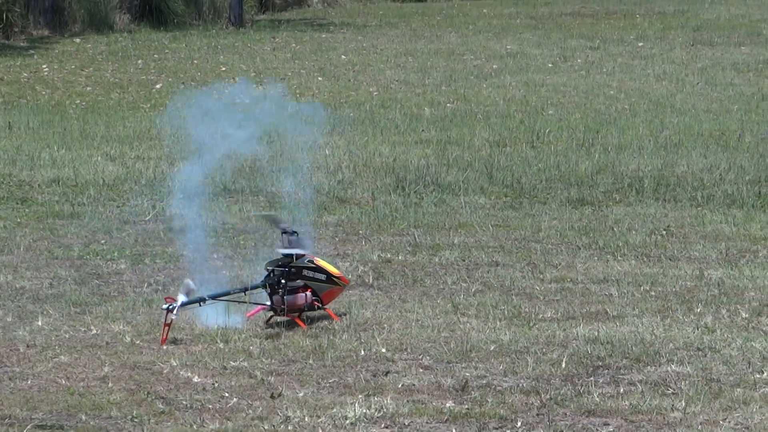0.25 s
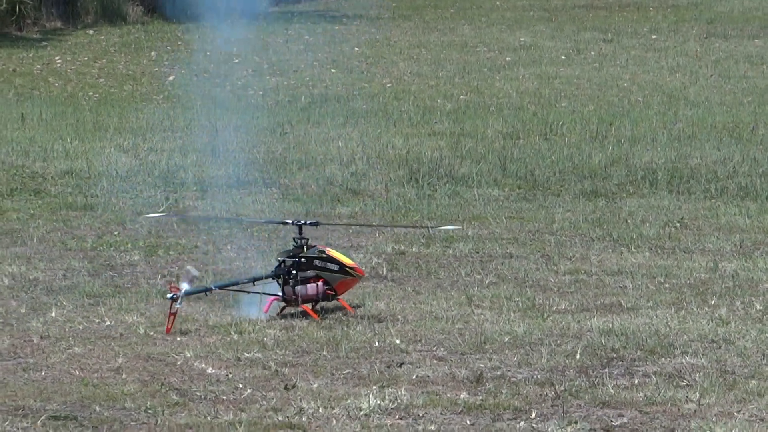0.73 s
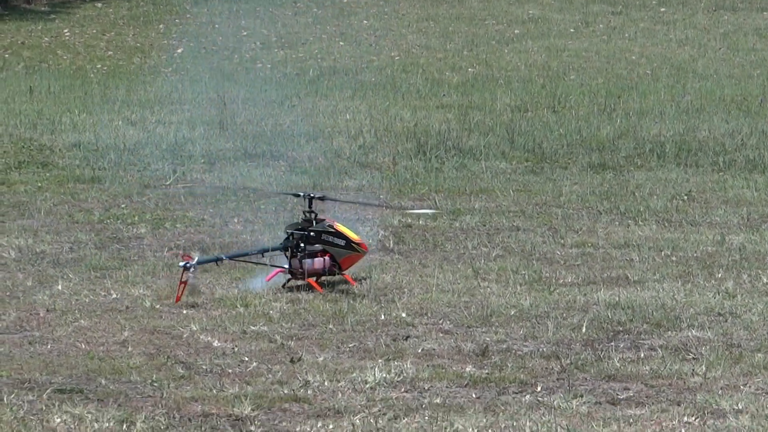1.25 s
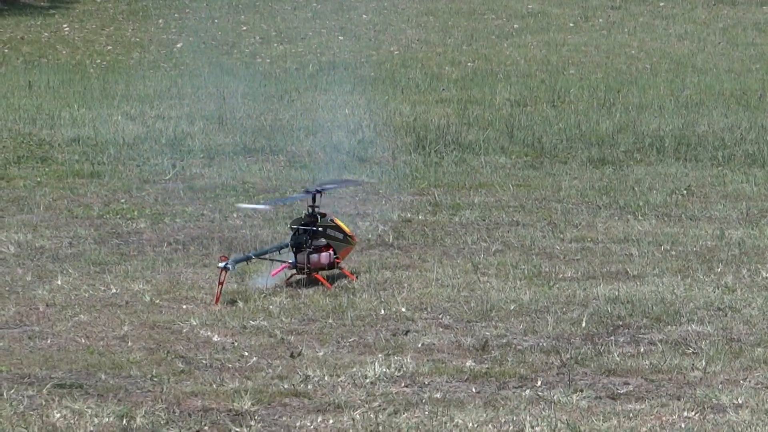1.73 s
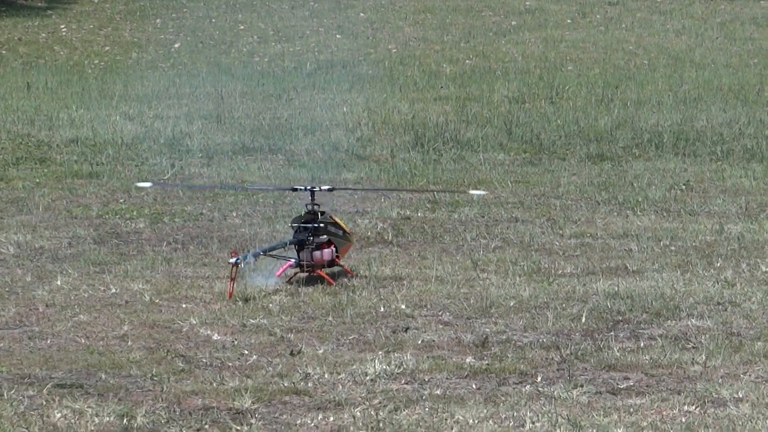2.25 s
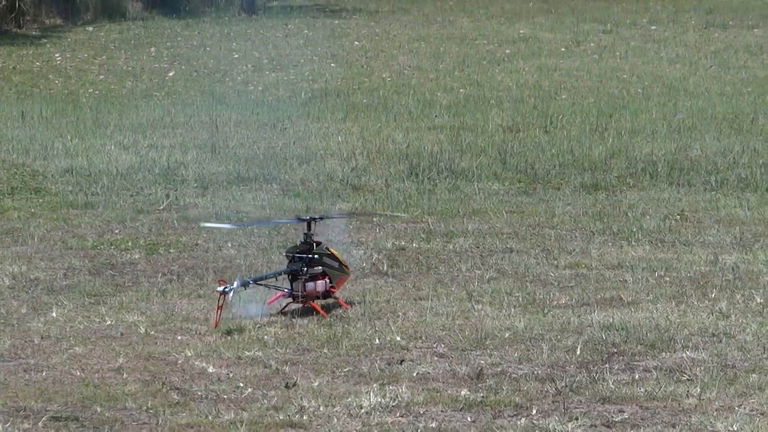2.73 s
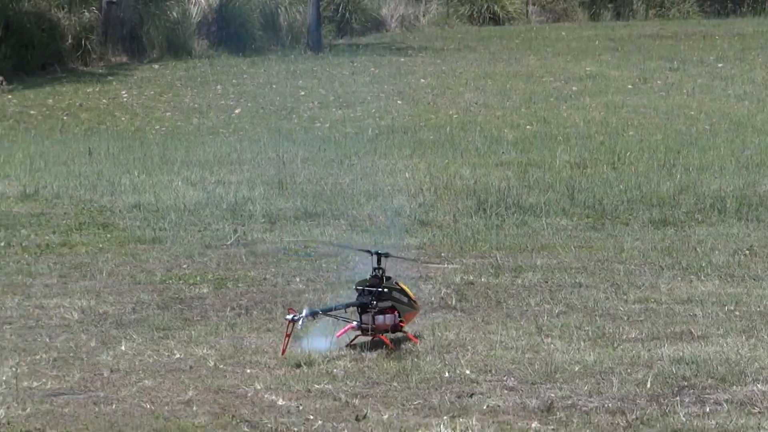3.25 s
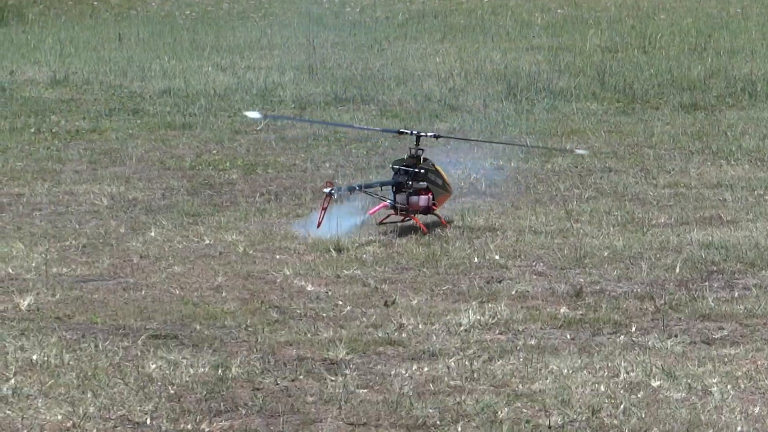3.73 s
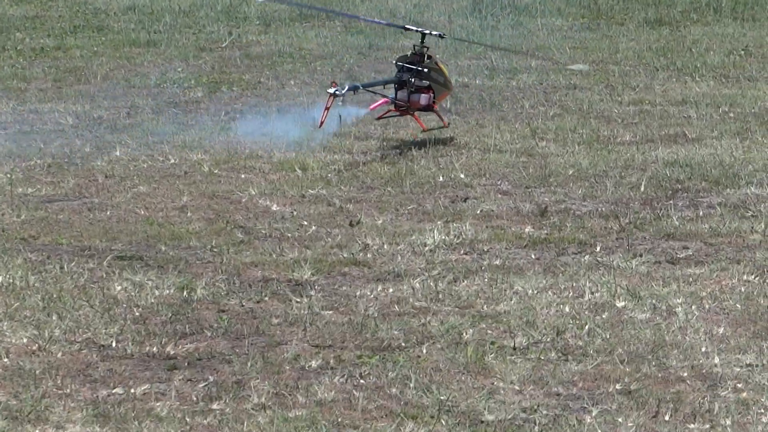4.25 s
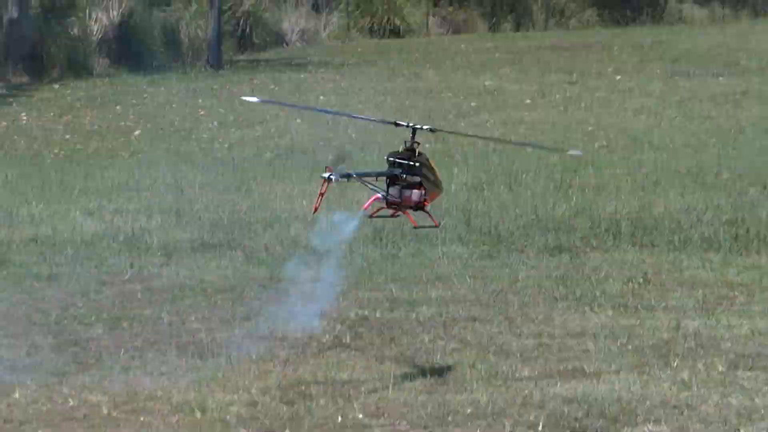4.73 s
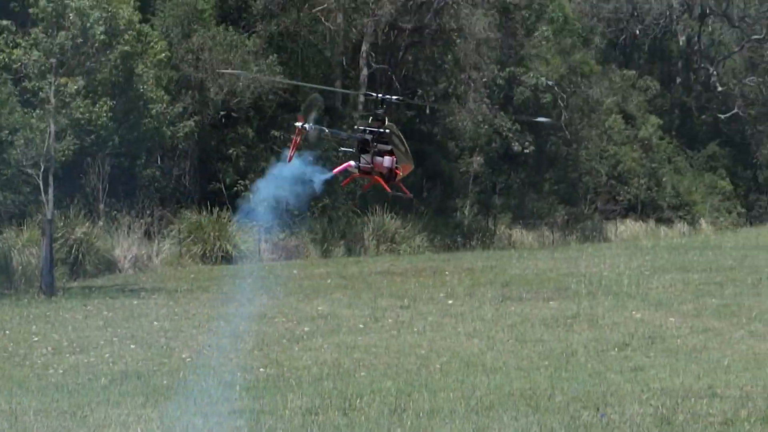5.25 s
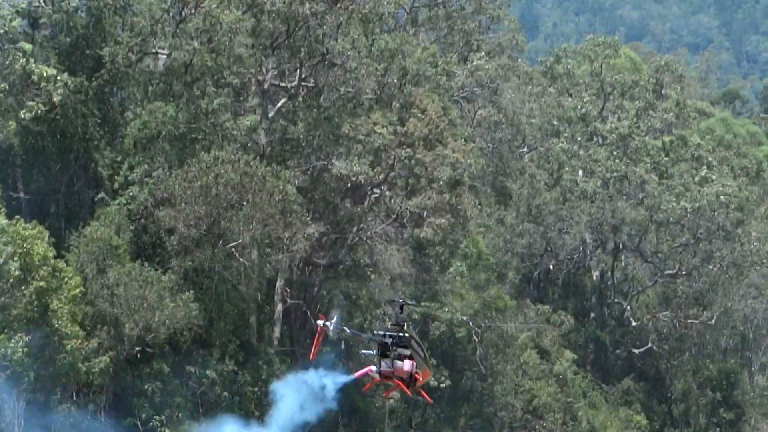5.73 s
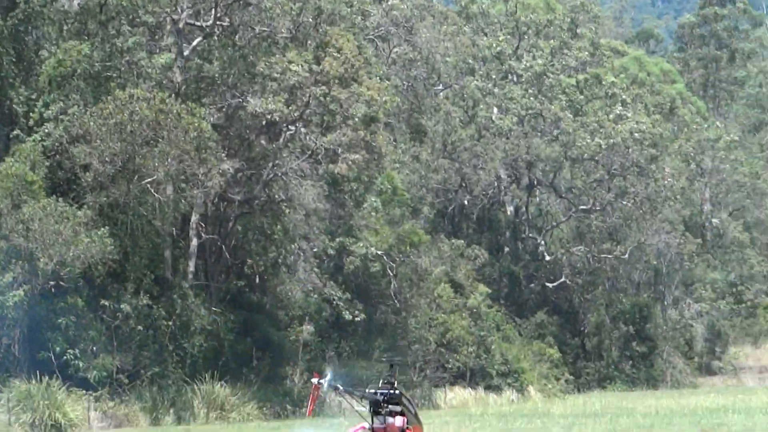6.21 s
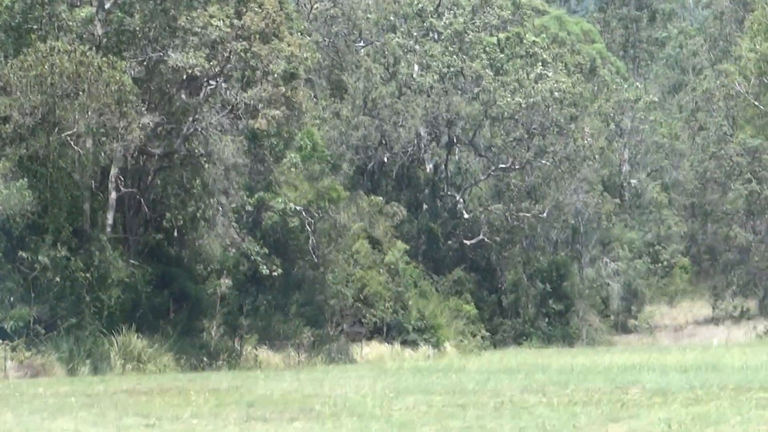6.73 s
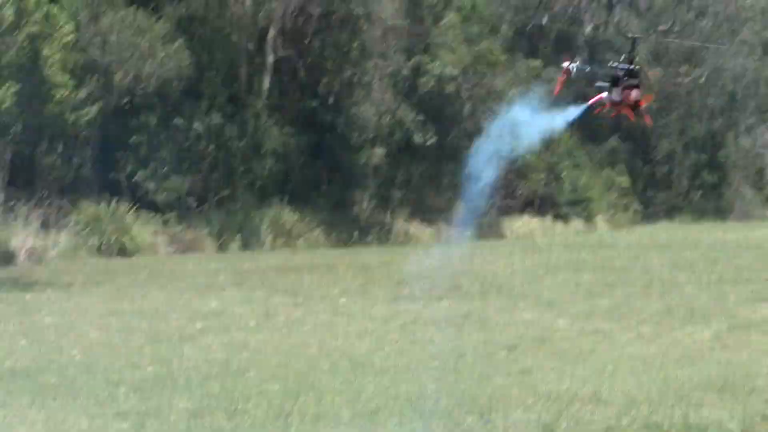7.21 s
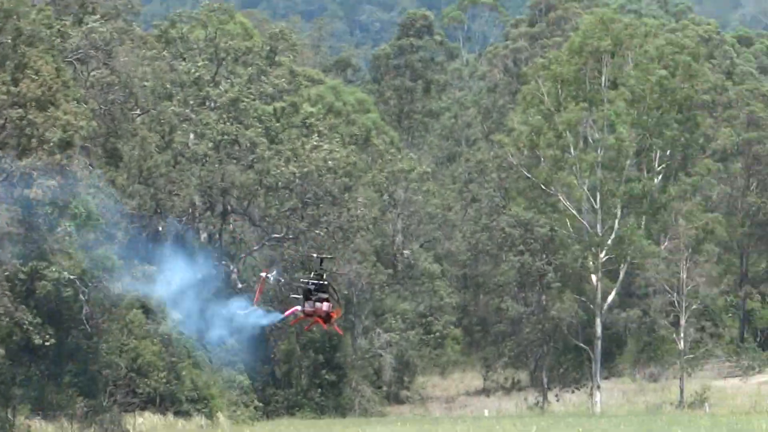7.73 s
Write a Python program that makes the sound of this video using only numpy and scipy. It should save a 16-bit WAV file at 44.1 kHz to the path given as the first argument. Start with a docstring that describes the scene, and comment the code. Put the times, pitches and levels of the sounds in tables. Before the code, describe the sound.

A small two-stroke model helicopter runs on open grass, heard through a stereo outdoor microphone with little space around it. From 0 to 3 s the engine holds a nearly steady buzz near 235 Hz, under a piercing cooling-fan whine around 2.3 kHz and dense, bright airy hiss; a soft dull pop comes at 1.3 s and the pitch sags slightly. From 3 s it revs up, rotor and gear tones emerging, the whine throbbing as it lifts off around 4 s. Through 4.5-5.7 s the exhaust grows fuller and harsher at a wavering, nearly level pitch. From 5.8 to 6.8 s engine, gears and rotors climb together to about 286 Hz. Near 7 s the engine bogs abruptly, dropping in pitch with a rough growl, then clears and rises steadily to nearly 300 Hz, still running at the 8 s cut.

```python
"""The two-stroke of a glow-fuel model helicopter on grass: exhaust partials, bearing tones and cooling-fan
whine, all sines locked to the crank. The clutch drags the rotors up to it; the machine lifts off and turns
while the clutch still slips; once it grips, engine, gears and rotors climb together. Rotor and gear tones
follow the clutch bell; gas and air make a broad hiss of filtered noise, with one dull pop."""
import sys
import numpy as np
from scipy import signal
from scipy.fft import rfft, irfft, next_fast_len
from scipy.io import wavfile
from scipy.ndimage import uniform_filter1d

SR = 44100
rng = np.random.default_rng(int(sys.argv[2]) if len(sys.argv) > 2 else 0)


def to_wav(sig):
    """Store sig (one row per channel, or 1-D mono) as 16-bit WAV at the path in sys.argv[1].

    Samples outside -1..1 are clipped; the rate is SR.
    """
    pcm = np.clip(np.atleast_2d(sig), -1, 1) * 32767
    pcm = np.round(pcm).astype(np.int16)
    wavfile.write(sys.argv[1], SR, pcm.T)  # frames by channels


N = 351477
T = np.arange(N) / SR

# exhaust swells as the silencer turns and leaves the ground: start_s, third_db, fifth_db, seventh_db
EXHAUST_SWELLS = [(0, 0, -1, -4), (1.2, -3.3, -1.2, -3.5), (1.36, -2, -7.5, 3.5), (2.5, -1, -14.5, 1),
                  (2.75, -1, -8, 2.5), (3.1, -1.5, -5, -4.5), (3.85, 4, 8, 16.5), (4.33, 5, 4.5, 19),
                  (4.65, 9, 12, 21.5), (4.9, 14.5, 16.5, 19.5), (5.15, 15, 11.5, 14), (5.75, 15.5, 12, 7),
                  (6.1, 15, 6.5, 10), (6.35, 11, 6.5, 13), (6.6, 7.5, 17, 8), (7.1, 13.5, 7, 5.5),
                  (7.35, 6.5, 14.5, 6), (7.7, .7, 18.5, 13.5), (7.97, 4, 16.5, 17)]
# gas and air noise: start_s, gain_db, aloft_share, rumble_db (bands under 700 Hz)
HISS_COURSE = [(0, 44.5, 0.15, 0), (1.24, 46, .05, 2), (1.53, 44.5, .03, 1.5), (1.93, 46.5, 0.032, 1.5),
               (3.3, 45, 0.076, 1), (4.1, 44.5, .25, -1), (4.6, 44.5, 0.46, -9), (4.9, 44.5, 0.69, -5),
               (5.8, 45, 0.76, -7), (6.7, 46, 0.92, -7), (6.9, 44.5, 1.14, -4), (7.15, 45.5, 0.69, -7),
               (7.6, 44.5, 0.71, -1), (8, 44.5, 1.08, -5)]


def undb(db):
    """Amplitude ratio of a level in dB."""
    return 10 ** (np.asarray(db) / 20)


def curves(table):
    """Columns of a table, interpolated from its times to every sample."""
    s, *columns = np.transpose(table)
    return [np.interp(T, s, c) for c in columns]


def at_hz(table, hz):
    """Level in dB, interpolated over log frequency."""
    table_hz, db = np.transpose(table)
    return np.interp(np.log(hz), np.log(table_hz), db)


def walk(rate_hz):
    """Random levels held 1 / rate_hz s and slewed twice; spread near 1."""
    hold = max(int(SR / rate_hz), 1)
    steps = np.repeat(rng.standard_normal(N // hold + 1), hold)
    return 1.142 * uniform_filter1d(uniform_filter1d(steps, hold), hold)[:N]


def bump(s, width_s):
    """A bell-shaped swell from 0 to 1 and back."""
    return np.exp(-((T - s) / width_s) ** 2)


def tone(turns, db, flutter_db, waver_rad, waver_hz=60):
    """A sine of nominal rms level db whose size flutters and whose phase wavers."""
    phase = 2 * np.pi * (turns + rng.random()) + waver_rad * walk(waver_hz)
    return np.sqrt(2) * undb(db + flutter_db * walk(35)) * np.sin(phase)


def exhaust(turns):
    """Gas pulses, one firing per crank turn: partials of the firing rate, swelling apart."""
    # main partials: firing_multiple, rest_db, third_share, fifth_share, seventh_share, bog_db
    partials = [(1, -50.5, -0.059, 0.2, 0.22, 9), (2, -38.5, -0.22, 0.21, -0.12, 0),
                (3, -40.5, 0.83, -0.0032, -0.059, -13), (4, -41.5, 0.045, 0.0047, 0.21, 1),
                (5, -42, -0.16, 1, 0.067, -1), (6, -28.5, 0.3, 0.087, -.36, 6),
                (7, -47.5, -0.14, 0.12, 1, 18.5)]
    # other partials: firing_multiple, rest_db, seventh_share
    others = [(8.02, -55, 1), (9.01, -42, 0.34), (10.98, -50, 0.6), (12, -36, -0.23), (12.97, -48.5, 0.48),
              (13.73, -48, 0.4), (14.94, -49, 0.79), (16.18, -40.5, -0.049), (16.5, -53, -0.0049),
              (17.87, -45, .05), (18.96, -47.7, -0.07), (30.06, -44, 0.011)]
    # strong and weak firings alternate: firing_multiple, relative_db
    half_rate = [(.5, -9), (1.5, 0), (2.5, 3), (3.5, 4)]
    third_db, fifth_db, seventh_db = curves(EXHAUST_SWELLS)

    # the pilot pulls up hard: the engine bogs ever deeper, then clears at once
    bog_s, build_s, clear_s, other_bog_db = 6.97, 0.19, 0.053, 15.5
    bog = bump(bog_s, np.where(T < bog_s, build_s, clear_s))

    # the 4th partial all but vanishes from lift-off until the climb
    from_s, to_s, edge_s, depth_db = 3.5, 6.3, 0.17, -27
    hollow_db = depth_db / 2 * (np.tanh((T - from_s) / edge_s) - np.tanh((T - to_s) / edge_s))

    out = np.zeros(N)
    for k, rest_db, a, b, c, bog_db in partials:
        db = rest_db + a * third_db + b * fifth_db + c * seventh_db + bog_db * bog
        out += tone(k * turns, db + hollow_db * (k == 4), 0.69, 0.068 * k)
    for k, rest_db, share in others:
        out += tone(k * turns, rest_db + share * (seventh_db + other_bog_db * bog), 1.5, 0.5)

    half_db = -77.5 + 19 * bump(3.53, 0.6)
    for k, db in half_rate:
        out += tone(k * turns, half_db + db, 1.6, 0.2)
    return out


def crank_bearing(turns, aloft):
    """Balls rolling past one spot of the race: a tone at the ball rate and its overtones."""
    # rest_db, aloft_db, seventh_share
    ball_partials = [(-45, -57, -0.23), (-48, -44, -0.1), (-46, -53, 0.94)]
    balls_per_turn = 3.62
    seventh_db = curves(EXHAUST_SWELLS)[2]
    out = np.zeros(N)
    for k, (rest_db, aloft_db, share) in enumerate(ball_partials, 1):
        db = rest_db + aloft * (aloft_db - rest_db) + share * seventh_db
        out += tone(k * balls_per_turn * turns, db, 1.2, 0.2)
    return out


def fan_whine(turns, blades, aloft):
    """Cooling-fan blade rate and overtones; each main blade passing overhead throbs the whine."""
    # blade-rate partials: start_s, first_db, second_db, third_db
    fan_levels = [(0, -27, -32.5, -31), (1.15, -26, -30, -35), (1.5, -28, -33.5, -34),
                  (2.6, -24.5, -38, -30), (3.4, -24.5, -28.5, -48), (4.15, -21, -35, -28),
                  (4.71, -17.5, -37, -29), (4.84, -26, -36, -30.5), (4.97, -20, -35, -32),
                  (5.2, -25.5, -36, -34), (5.5, -22, -30, -30), (5.95, -26, -27, -43),
                  (6.1, -23.5, -36, -28.5), (6.47, -17.5, -42, -30.5), (6.68, -26.5, -33, -44),
                  (6.75, -24, -29, -38), (6.9, -20, -40, -40), (6.95, -31, -42, -40), (7.0, -32, -42, -38),
                  (7.03, -21, -41, -37), (7.14, -33, -40, -27), (7.17, -21, -40, -31),
                  (7.75, -19, -36, -41), (7.97, -25, -38, -45)]
    # phase waver of partials 2 and 3: blur_rad
    blurs_rad = [.45, 1.4]
    # faint partials 4 and 5: grass_db, aloft_db, blur_rad
    faint_partials = [(-35.5, -49, 2.2), (-56, -68, 1.2)]
    fan_turns = 10 * turns  # 10 blades

    first_db, *overtone_db = curves(fan_levels)
    fan = tone(fan_turns, first_db, 0.65, 0.64)
    for k, db in enumerate(overtone_db):
        fan += tone((k + 2) * fan_turns, db, 1.5, blurs_rad[k], 150)
    for k, (grass_db, aloft_db, blur_rad) in enumerate(faint_partials, 2 + len(blurs_rad)):
        db = grass_db + aloft * (aloft_db - grass_db) + 4.5 * walk(2.58)
        fan += tone(k * fan_turns, db, 1.55, blur_rad, 150)

    throb_db = 0.84 + 2.5 * bump(4.1, 0.42)  # deepest at lift-off
    return fan * undb(throb_db * np.sin(2 * np.pi * blades))


def hiss(turns):
    """Bands of gas and air noise that flicker partly alone, partly together, and puff with each firing."""
    # spectrum on the grass, before gain_db: centre_hz, density_db
    grass_spectrum = [(30, -112), (70, -102), (130, -94), (300, -79.5), (600, -80.5), (900, -68),
                      (1500, -61.5), (2900, -62), (4000, -61.5), (5700, -61.5), (7200, -62.5),
                      (10500, -65.5), (12000, -77), (15500, -93.5)]
    # spectrum aloft, before gain_db: centre_hz, density_db
    aloft_spectrum = [(30, -99), (70, -92), (130, -86), (300, -78), (600, -66.5), (900, -68.5),
                      (1500, -64.5), (2900, -62), (4000, -57.5), (5700, -61), (7200, -61.5), (10500, -63.5),
                      (12000, -72.5), (15500, -89)]
    # dips and rings while the machine stands still: centre_hz, width_hz, gain_db
    grass_comb = [(800, 86, 0), (1050, 167, -17), (1760, 560, -10.5), (3954, 215, 5.5), (4670, 410, 3.5),
                  (7060, 350, 5.5), (8210, 106, -9), (8160, 124, 9), (9560, 190, 4.5), (10400, 150, -1)]
    # stereo width: centre_hz, side_minus_mid_db
    side_spectrum = [(60, -30), (110, -32), (200, -20), (380, -10.5), (700, -12), (1290, -60), (2380, -14),
                     (4400, -11.5), (8120, -13), (11000, -23), (15000, -40)]
    gain_db, aloft, rumble_db = curves(HISS_COURSE)

    size = next_fast_len(N)
    hz = np.maximum(np.arange(size // 2 + 1) * SR / size, 1)
    mid, side = rfft(rng.standard_normal((2, size)))
    noise = np.array([mid, side * undb(at_hz(side_spectrum, hz))])
    comb_db = sum(db * np.exp(-((hz - f) / w) ** 2) for f, w, db in grass_comb)
    grass = undb(at_hz(grass_spectrum, hz) + comb_db)
    air = undb(at_hz(aloft_spectrum, hz))

    shared_db, gusts_db, top_db = 0.45 * walk(6), 1.03 * walk(18), 2.4 * walk(2.3)
    out = np.zeros((2, N))
    for octave in np.arange(4.5, 14.2, 0.5):
        centre_hz = 2 ** octave
        window = np.cos(np.pi / 2 * np.clip(2 * (np.log2(hz) - octave), -1, 1)) ** 2
        low = irfft(noise * window * grass, size)[:, :N]
        high = irfft(noise * window * air, size)[:, :N]
        flicker_db = shared_db + 0.39 * walk(14)
        flicker_db += top_db * (centre_hz > 11000) + gusts_db * (centre_hz > 7500)
        flicker_db += rumble_db * (centre_hz < 700)
        out += (low + aloft * (high - low)) * undb(flicker_db)
    out *= (1 + 0.084 * np.cos(2 * np.pi * turns)) * undb(gain_db)

    # a narrow ring in the airflow that throbs; the reversed spectrum serves as fresh noise
    grass_db, aloft_db = -47, -32
    ring_db = grass_db + aloft * (aloft_db - grass_db) + 0.73 * walk(2.5) + 3.7 * walk(30)
    ring = irfft(mid[::-1] * np.exp(-((hz - 9800) / 330) ** 2), size)[:N]
    out[0] += ring / ring.std() * undb(ring_db)
    return np.array([out[0] + out[1], out[0] - out[1]])


def rotors(blades, bell_hz):
    """Two-blade main and tail rotors: blade-rate tones that grow with speed."""
    # main rotor: blade_rate_multiple, relative_db
    main_partials = [(1, -5), (2, 0), (2.5, -4), (3, 0), (3.5, -4), (4, 4), (5, 4), (5.5, 5), (6, 5),
                     (6.5, -2), (7, 1), (7.5, -4), (8, 1), (9.5, 11), (10, 2)]
    doublings = np.log2(bell_hz / 250)
    # dB at a bell speed of 250 Hz + dB per doubling of speed
    tail_db, second_db = -48.5 + 23.4 * doublings, -50 + 35 * doublings
    upper_db, main_db = -59.5 + 13 * doublings, -71.5 + 37 * doublings

    tail_blades = 4.5 * blades  # tail gear ratio
    out = tone(tail_blades, tail_db, 0.65, 0.1) + tone(2 * tail_blades, second_db, 0.58, 0.1)
    for k in range(3, 6):
        out += tone(k * tail_blades, upper_db, 1.5, 0.3)
    for k, db in main_partials:
        out += tone(k * blades, main_db + db, 1.0, 0.19)
    return out


def gear_mesh(bell_turns, slip):
    """Second mesh tone of the pinion; clutch slip blurs it and raises its neighbours."""
    # gear whine: start_s, level_db
    gear_levels = [(0, -67), (3.4, -37), (3.75, -31), (4.3, -28.5), (4.75, -25.5), (4.95, -29), (5.3, -40),
                   (5.6, -28), (5.9, -21.5), (6.15, -30), (6.7, -39), (6.95, -32), (7.15, -22.5),
                   (7.4, -41), (8, -20.5)]
    # neighbours: pinion_turns_away, no_slip_db (relative)
    neighbours = [(-0.78, -25), (0.93, -22)]
    gear_db = curves(gear_levels)[0]
    mesh = 2 * 10  # second tone of 10 teeth
    out = tone(mesh * bell_turns, gear_db, 2.05, 0.94 + 1.3 * slip, 200)
    for k, db in neighbours:
        out += tone((mesh + k) * bell_turns, gear_db + db + 40 * slip, 3.16, 0.54, 200)
    return out


def pops():
    """A soft push of air about two cycles long."""
    # dull pop: start_s, level_db, pitch_hz, length_ms
    pop_list = [(1.308, -23.5, 280, 8)]
    out = np.zeros(N)
    for s, db, hz, ms in pop_list:
        u = np.clip((T - s) / (ms / 1000), 0, 1)
        out += undb(db) * np.sin(np.pi * u) ** 2 * np.sin(2 * np.pi * hz * (T - s))
    return out


def two_ports(tones):
    """Two microphone ports hear the tones slightly out of step, one a little louder by turns."""
    quadrature = signal.hilbert(tones, next_fast_len(N))[:N].imag
    step = 0.027 * quadrature - 0.055 * np.gradient(tones)
    side = step * undb(8.1 * walk(2.18)) + (0.0087 + 0.017 * walk(4)) * tones
    return tones + np.array([side, -side])


def scene():
    """Crank and clutch-bell speeds drive every tone; hiss and pop are added."""
    # crankshaft turns and firings per second: start_s, crank_hz
    crank_course = [(0, 233.6), (.2, 235.5), (1.1, 235), (1.42, 230.2), (2.55, 229.3), (3.02, 231.3),
                    (3.4, 235.2), (3.9, 242), (4.4, 245.7), (4.8, 247.8), (5.3, 246), (5.7, 247.2),
                    (6.06, 262), (6.46, 279.8), (6.62, 284.5), (6.77, 286.6), (6.88, 279.2), (7.0, 266.7),
                    (7.1, 269.3), (7.26, 277.5), (7.64, 288.3), (7.97, 297.8)]
    # slipping clutch bell, turns per second before the crank limit: start_s, bell_hz
    bell_course = [(0, 40), (3.0, 129), (3.8, 153.6), (4.2, 170), (5.1, 204), (5.7, 240.5), (6.2, 268.5),
                   (6.4, 300), (8, 303.3)]
    inertia_s = 0.062  # the flywheel rounds every change of speed
    crank_hz = uniform_filter1d(curves(crank_course)[0], int(inertia_s * SR), mode="nearest")
    crank_hz *= 1 + 0.001367 * walk(40) + 0.000699 * walk(8)  # uneven burning
    turns = np.cumsum(crank_hz) / SR

    bell_hz = np.minimum(curves(bell_course)[0], crank_hz)  # never faster than the crank
    bell_turns = np.cumsum(bell_hz) / SR
    slip = np.minimum(1 - bell_hz / crank_hz, 0.35)
    blades = 2 * bell_turns / 8.5  # two blades, main gear ratio
    aloft = np.clip(curves(HISS_COURSE)[1], 0, 1)

    tones = exhaust(turns) + crank_bearing(turns, aloft) + fan_whine(turns, blades, aloft)
    tones += rotors(blades, bell_hz) + gear_mesh(bell_turns, slip)
    return two_ports(tones) + hiss(turns) + pops()


def record(dry):
    """A steep elliptic low-pass cuts the top."""
    top_hz = 15650
    return signal.sosfilt(signal.ellip(10, 0.2, 70, top_hz, fs=SR, output="sos"), dry)


dry = scene()
out = record(dry)
to_wav(out)
```